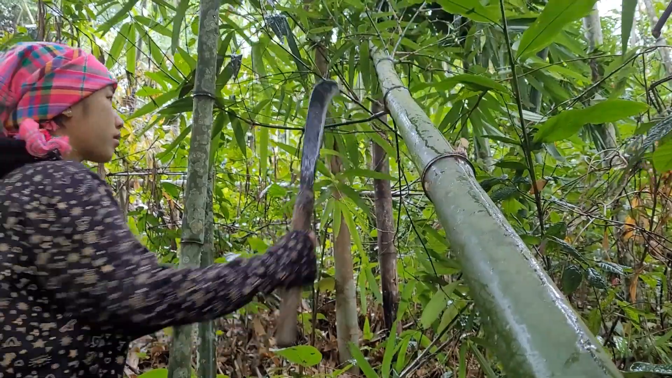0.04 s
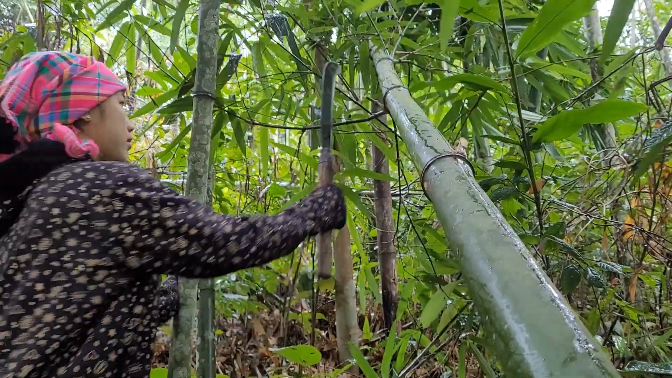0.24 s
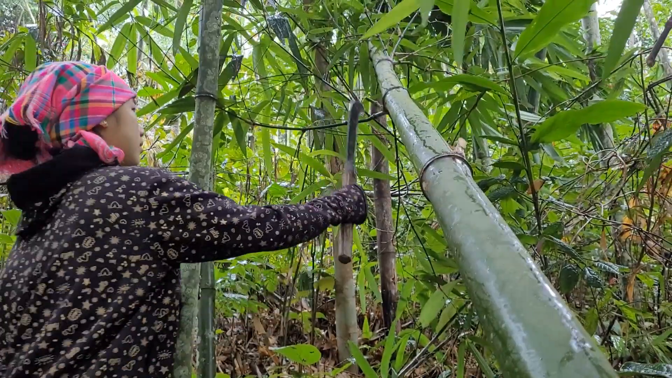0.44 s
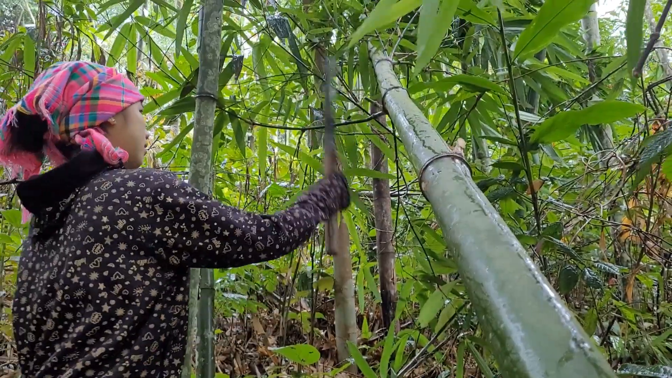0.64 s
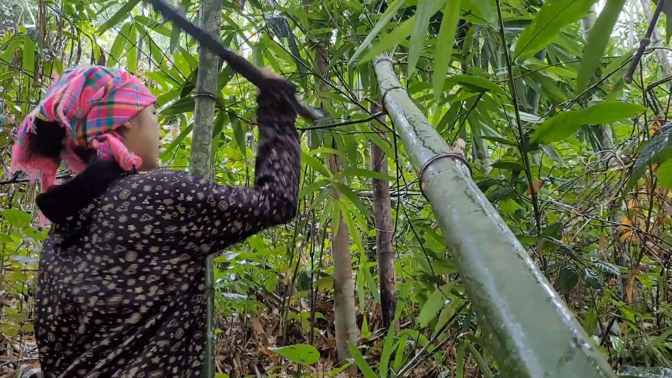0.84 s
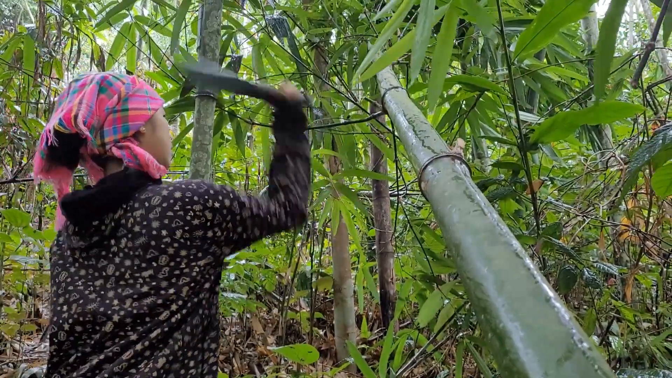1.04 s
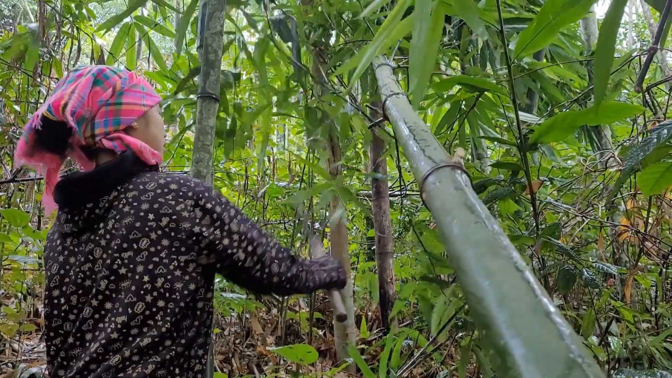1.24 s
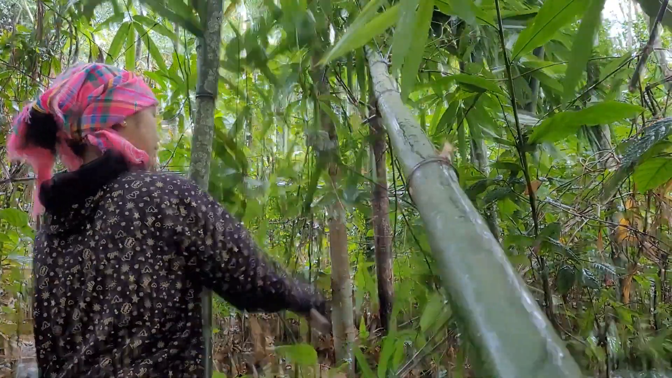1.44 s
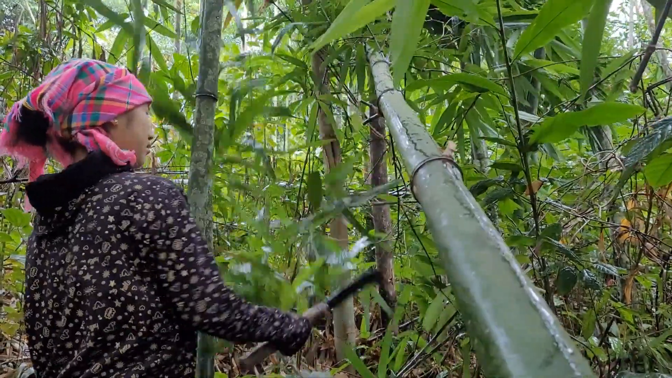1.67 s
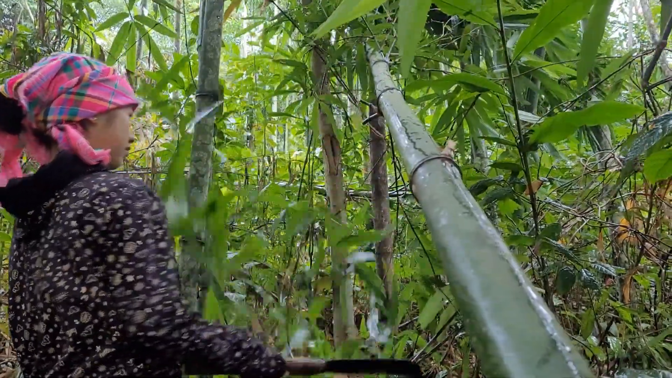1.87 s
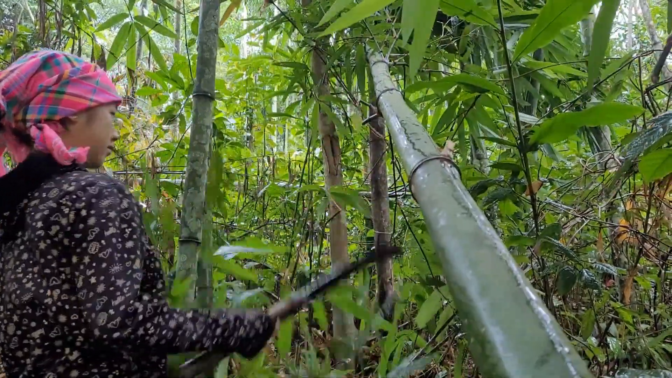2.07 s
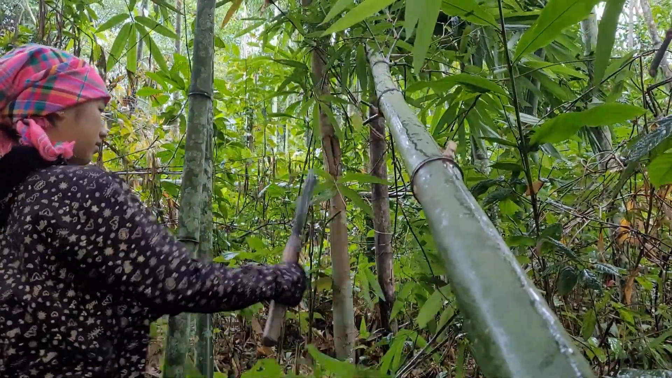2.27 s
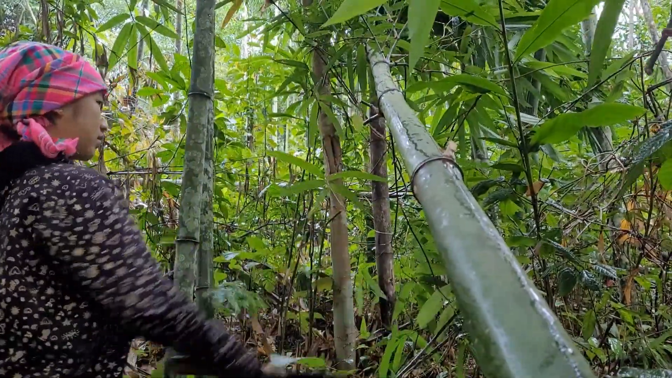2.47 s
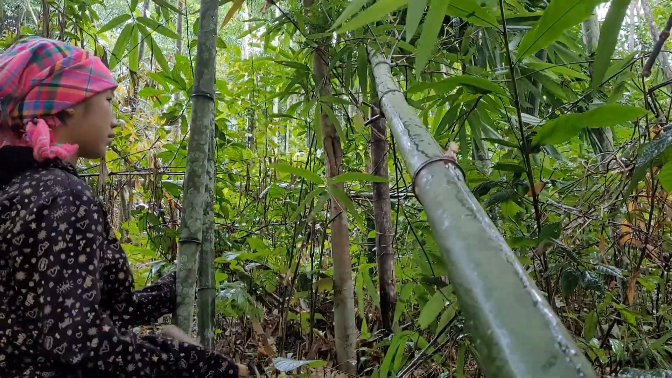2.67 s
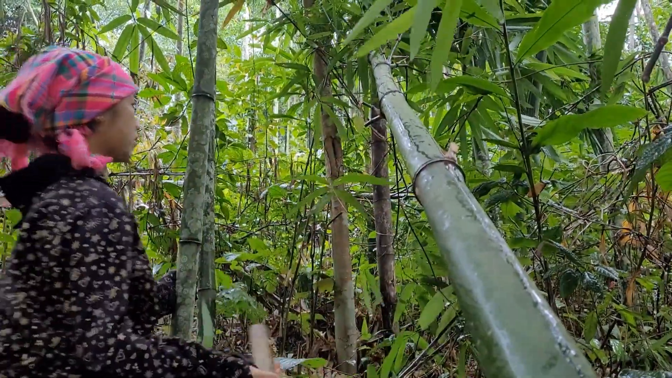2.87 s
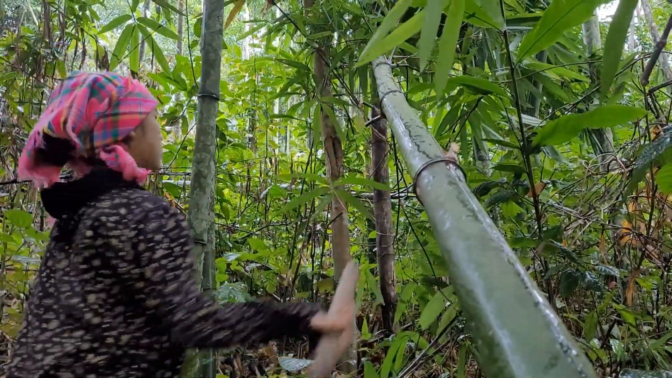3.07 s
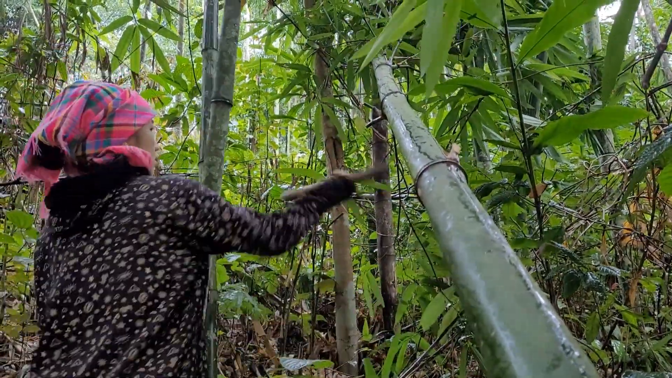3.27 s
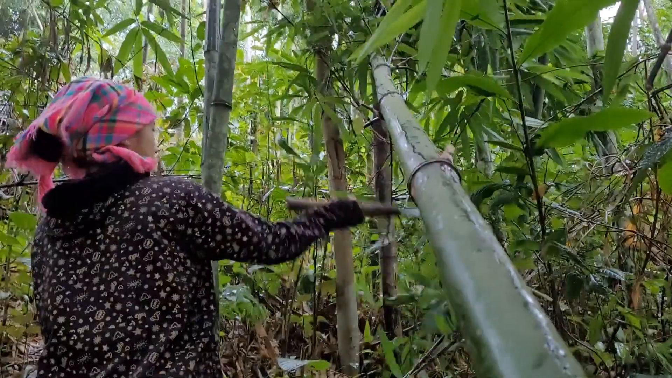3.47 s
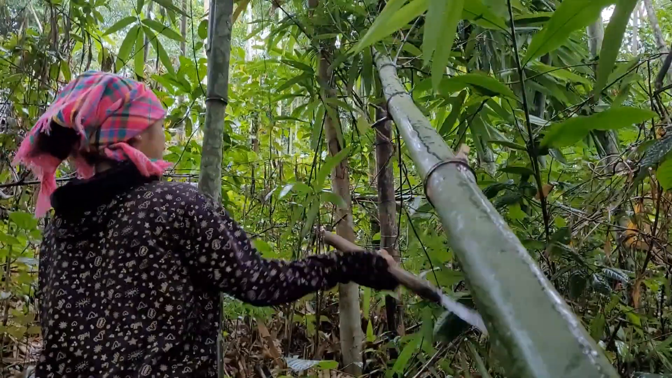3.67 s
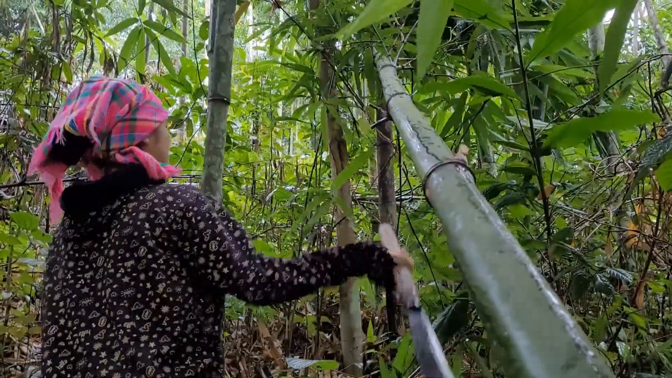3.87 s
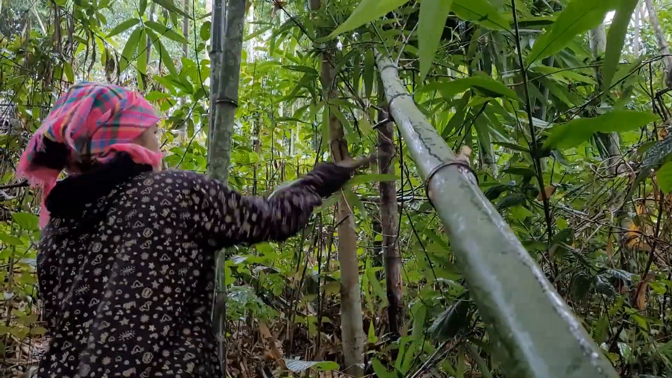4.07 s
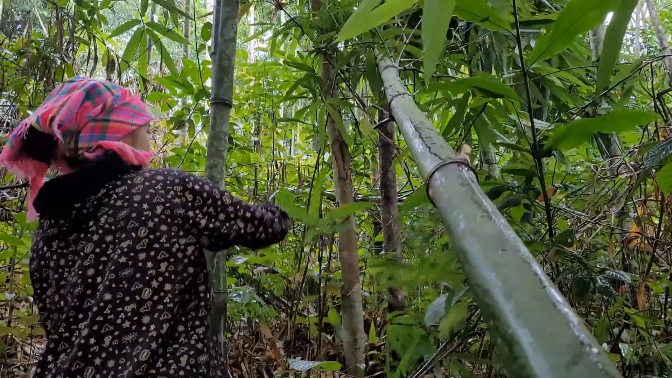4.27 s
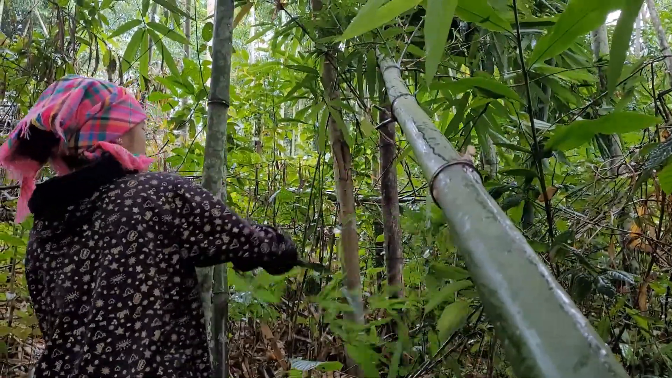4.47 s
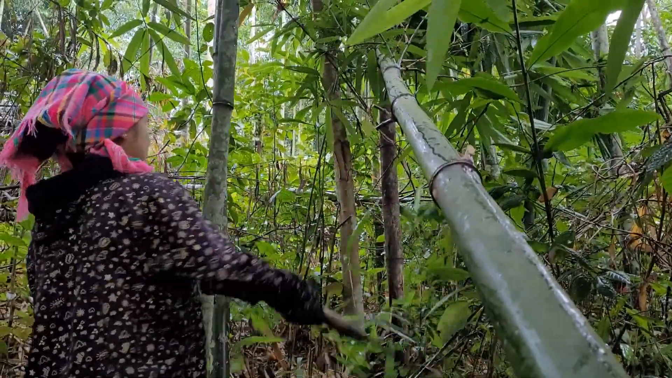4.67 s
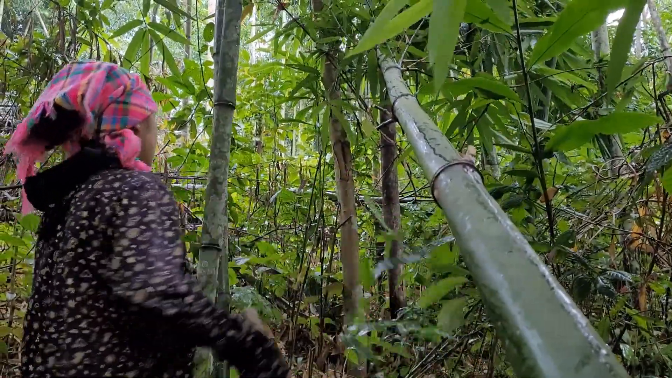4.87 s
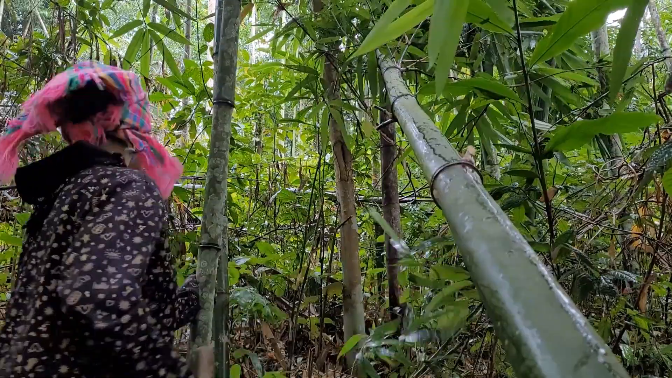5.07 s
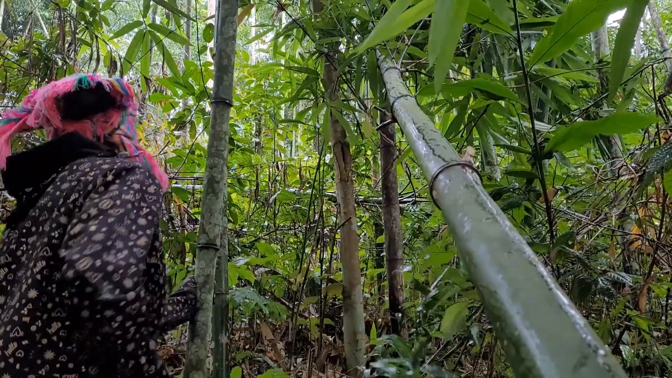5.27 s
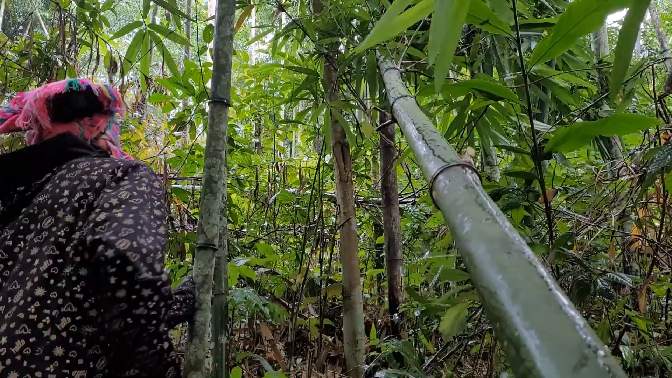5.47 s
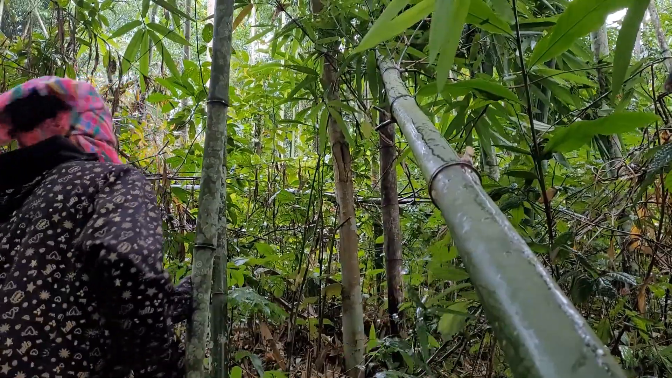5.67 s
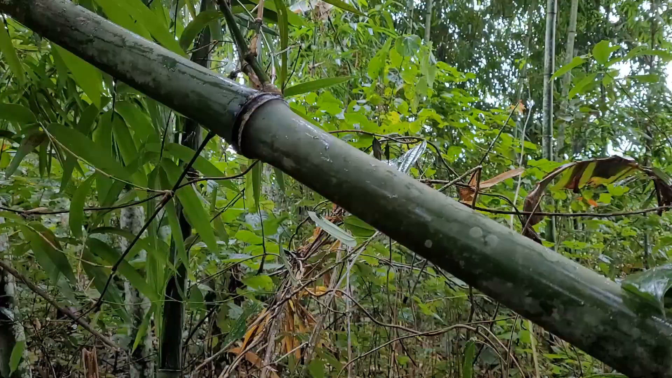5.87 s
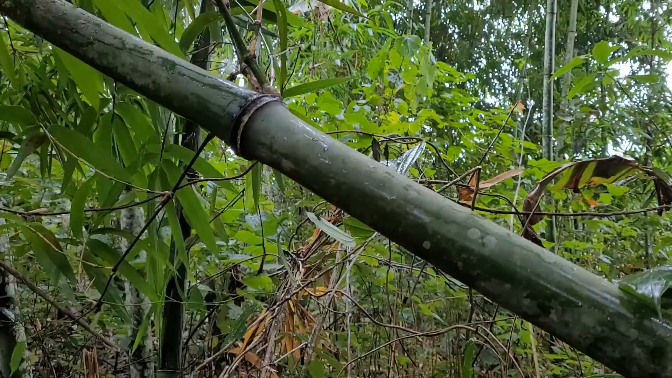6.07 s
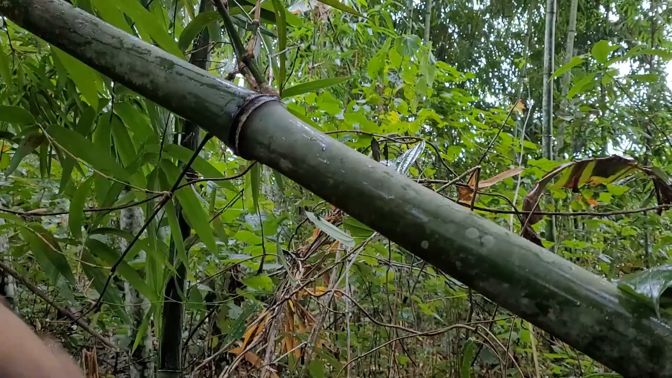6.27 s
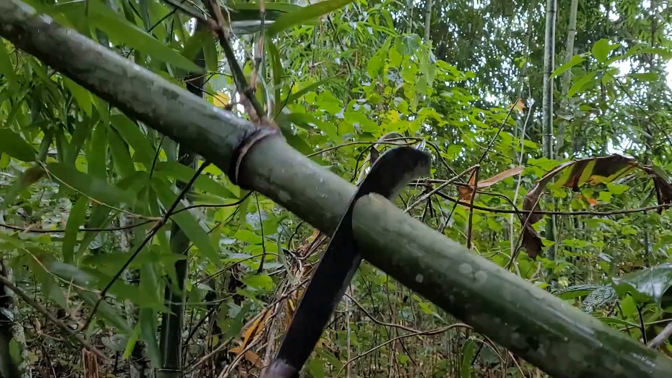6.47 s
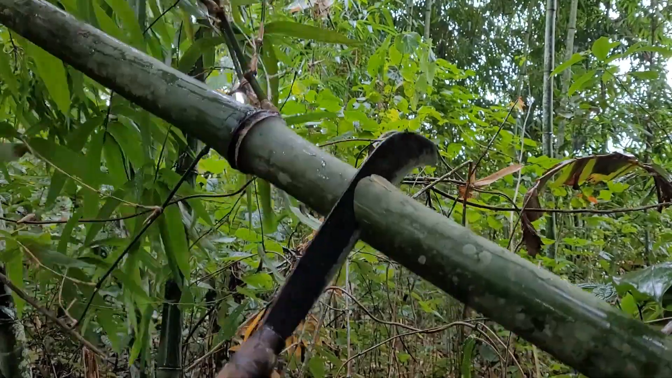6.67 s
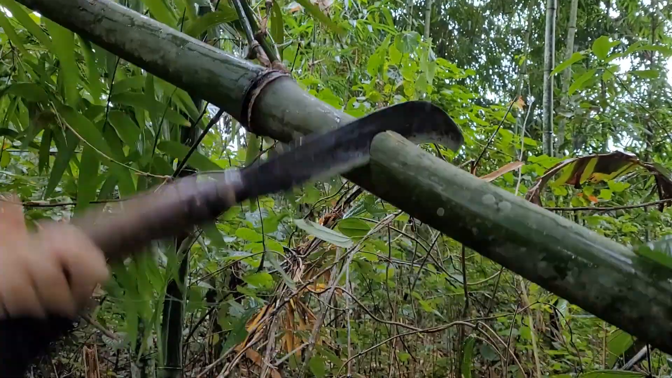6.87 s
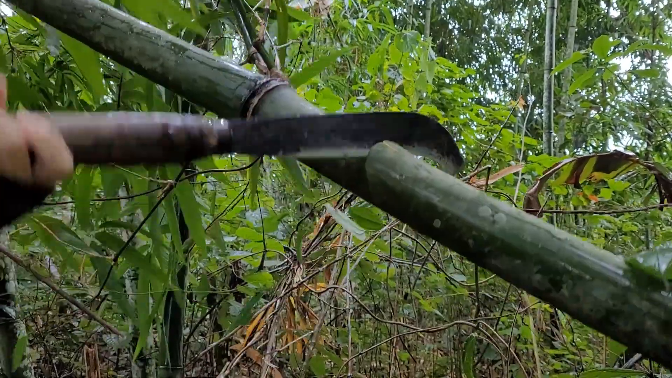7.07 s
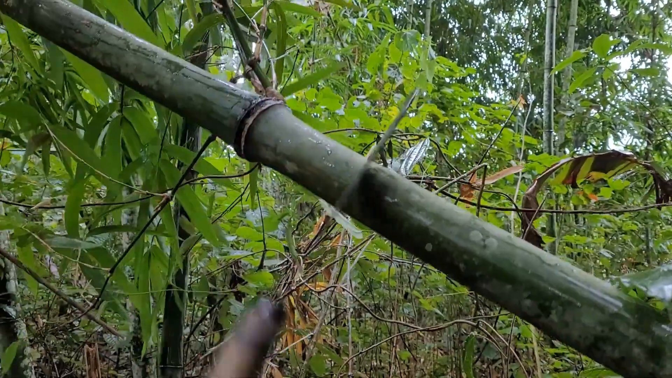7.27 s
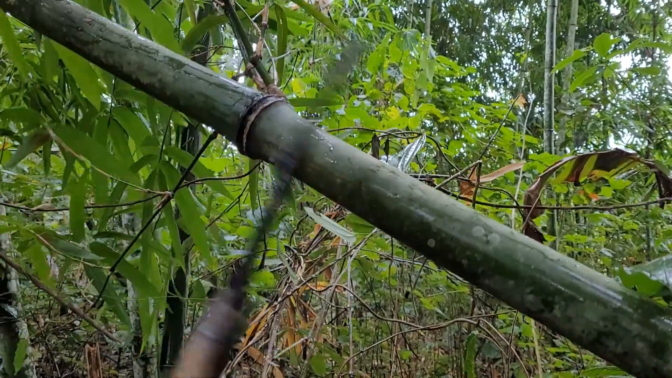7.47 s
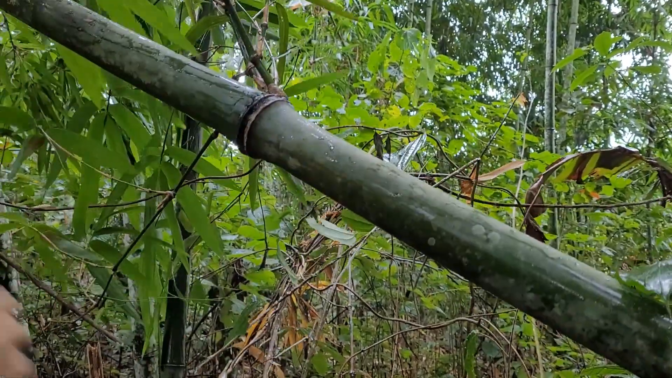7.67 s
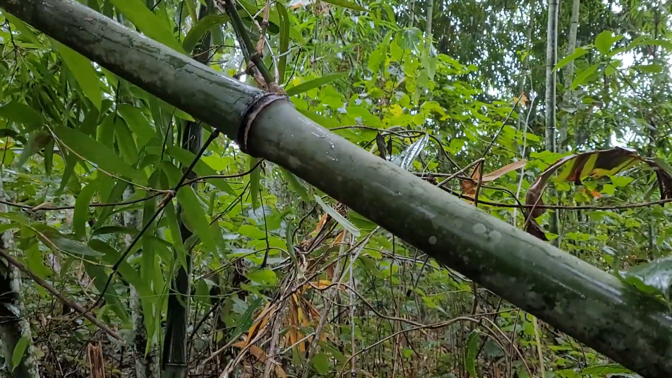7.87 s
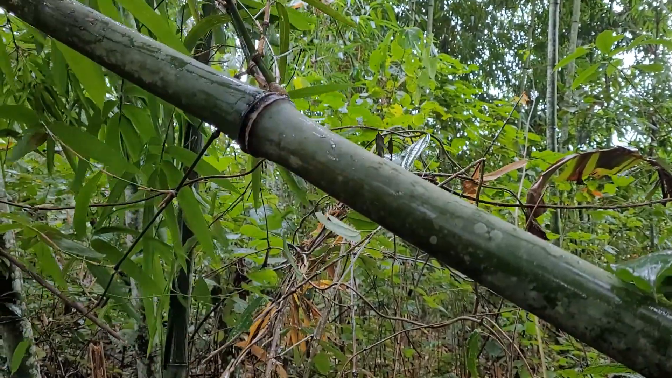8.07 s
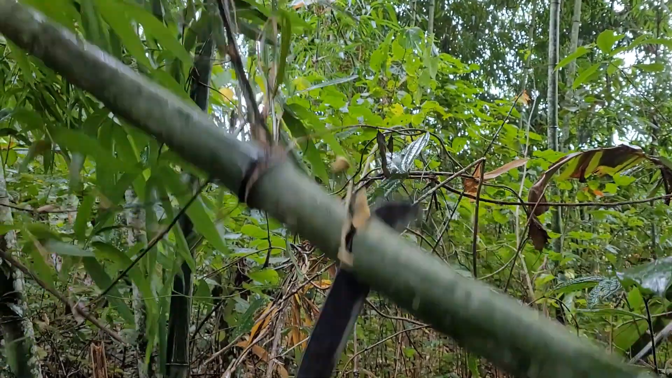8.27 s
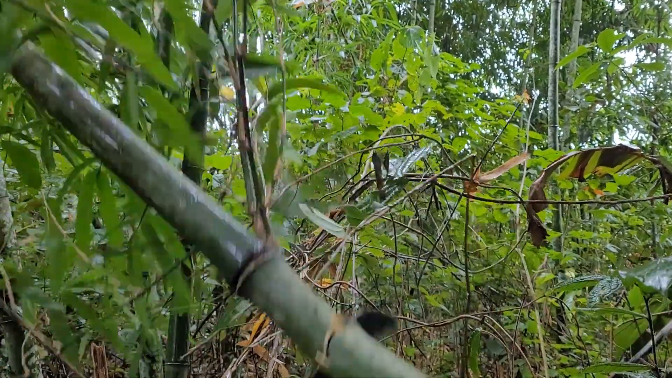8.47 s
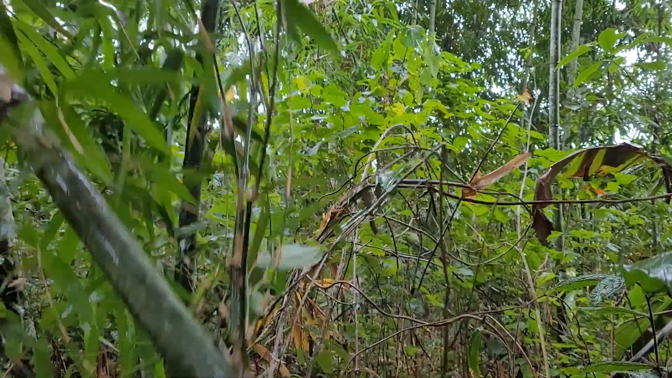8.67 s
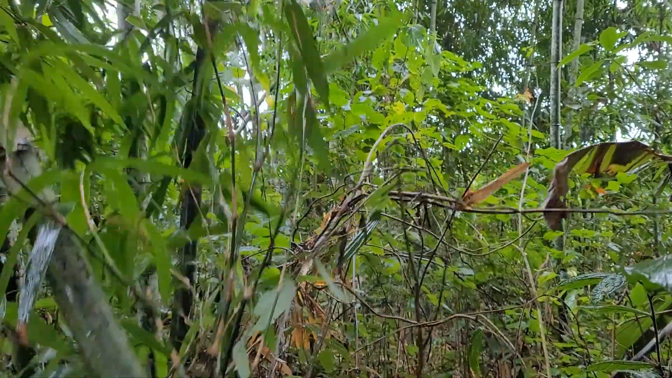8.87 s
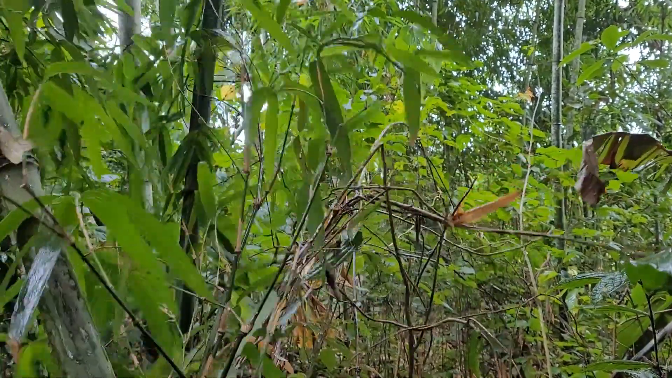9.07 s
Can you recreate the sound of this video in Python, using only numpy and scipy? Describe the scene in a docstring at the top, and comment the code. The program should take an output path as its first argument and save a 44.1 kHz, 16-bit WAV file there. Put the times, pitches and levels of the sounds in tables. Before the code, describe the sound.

Leaves rustle and twigs crackle outdoors while a blade strikes green bamboo at uneven intervals, each blow a crunchy crack with a short hollow ring. Branches thud and the steel briefly scrapes as it jerks loose. A final chop sets the stem groaning; it cracks apart and crashes through foliage with hollow knocks and rattling. The sound is close and in stereo, over a faint hush.

```python
"""A billhook lops branches, then fells a green bamboo culm, close to two microphones in a grove.
Leaves rustle and twigs snap throughout. From 0.5 s, chops crush fibres, ring the hollow culm and
shake the foliage; between them cut branches thump and the blade scrapes and jerks free.
After the last chop at 8.27 s the culm creaks in stick-slip, splits with a crack at 8.57 s and
falls through the leaves, knocking on stems while its split strips rattle."""
import sys
import numpy as np
from scipy import signal
from scipy.fft import rfft, irfft, next_fast_len
from scipy.io import wavfile
from scipy.ndimage import uniform_filter1d

SR = 44100
rng = np.random.default_rng(int(sys.argv[2]) if len(sys.argv) > 2 else 0)


def inscribe(sig):
    """Save sig as 16-bit PCM at rate SR to the path in sys.argv[1].

    A 1-D sig is mono; a 2-D sig holds one channel per row.
    Samples are clipped to [-1, 1] before scaling.
    """
    pcm = np.round(np.clip(np.atleast_2d(sig).T, -1, 1) * 32767)
    wavfile.write(sys.argv[1], SR, pcm.astype(np.int16))


N = 403074
N_FFT = next_fast_len(N)
TIME_S = np.arange(N) / SR
LEAD_S = .03  # run-up to an impact or scrape

# Foliage motion: time_s, level_db
RUSTLE = [(0, -70), (0.45, -61), (0.76, -65), (1.17, -65), (1.3, -44), (1.7, -45.5), (2.15, -48),
          (2.4, -47), (2.75, -48), (2.9, -56), (4.1, -55), (4.5, -53.5), (5.4, -59), (5.85, -57.5),
          (5.95, -61.5), (6.2, -79.5), (6.37, -65), (6.5, -38), (6.7, -50), (7.2, -58.5), (7.45, -74),
          (8.24, -60), (8.33, -32.5), (8.45, -42), (8.9, -41), (9.14, -40)]
# Leaf spectrum: freq_hz, density_db
LEAF_SPECTRUM = [(15, -54.5), (25, -32.5), (59, -11.5), (179, -18), (261, -8), (512, -10), (854, -5.5),
                 (1280, -2.5), (1500, -9.5), (1970, -2.5), (2250, -3.5), (7380, -4), (9160, -8.5),
                 (15700, -4)]
# Spectrum of stems and feet: freq_hz, density_db
STIR_SPECTRUM = [(25, -41.5), (60, -41.5), (300, -12.5), (700, -25), (2000, -37.5)]
# Hand, foot or branch brushing foliage: start_s, hold_s, leaves_db, stems_db
BRUSHES = [(0.13, 0.023, -55, -61), (1.913, 0.023, -66, -63), (2.27, 0.037, -50, -61),
           (2.544, 0.056, -50, -59), (3.502, 0.038, -56, -61.5), (4.794, 0.12, -53, -79),
           (5.02, 0.038, -77, -74.5), (5.601, 0.048, -57, -61.5), (5.773, 0.021, -45.5, -51),
           (6.266, 0.021, -59.5, -69), (6.545, 0.018, -61, -55), (6.683, 0.013, -56, -54),
           (6.843, 0.084, -55.5, -88), (7.587, 0.026, -56.5, -77), (8.656, 0.079, -36.5, -56)]
# Breaking twigs and fibres, and one short knock at 7.288 s: start_s, level_db, centre_hz
SNAPS = [(0.295, -51, 11000), (0.313, -58, 9100), (0.368, -54, 10000), (0.43, -57, 3020),
         (0.467, -51, 1940), (0.608, -47, 1510), (0.992, -60, 9000), (0.689, -56, 7000), (0.881, -49, 3530),
         (0.964, -49.5, 2100), (1.397, -41, 3010), (1.43, -31, 950), (1.706, -41.5, 1200),
         (1.803, -42.5, 2020), (2.274, -44, 605), (3.713, -50, 1290), (3.747, -54, 1294),
         (4.089, -55, 1200), (4.761, -44, 6050), (5.194, -47.5, 1816), (5.498, -51.5, 4350),
         (5.592, -52.5, 1153), (5.617, -53.5, 3395), (5.877, -48.5, 497), (5.995, -58, 3550),
         (6.031, -42.5, 1200), (6.201, -51, 2560), (6.301, -50, 2030), (6.493, -34, 1130),
         (6.632, -46, 696), (7.029, -52, 800), (7.112, -57.5, 3070), (7.288, -37, 790),
         (7.585, -49.5, 2780), (7.737, -59, 2980), (7.762, -53, 4950), (7.922, -56, 1010),
         (8.011, -51.5, 2990), (8.136, -50, 2470), (8.488, -49, 4040), (8.733, -29, 9300),
         (8.818, -34, 11600), (8.889, -38, 9050), (8.94, -33, 7900), (9.033, -33, 9100),
         (9.066, -37, 10020), (9.126, -38, 8950)]
# Spectrum of crushed fibres: freq_hz, density_db
CRUSH_SPECTRUM = [(180, -25), (300, -5.5), (545, -5.5), (698, -1.5), (1420, -5.5), (2220, -1.5), (3050, -4),
                  (3310, -3), (4110, -4), (6210, -6.5), (15700, -12.5)]
# Impacts on bamboo (chops, cut branches thumping, the blade jerking free, the culm splitting):
# start_s, crush_db, crack_db, crack_hz, low_band_re_crack_db, ring_db, ring_hz,
# thud_db, thud_hz, puff_db, crush_hold_s, crush_t60_s, crush_tilt_db_per_oct
IMPACTS = [(0.521, -41.5, -18, 2280, -33, -31.5, 377, -44.5, 232, -44, 0.0045, 0.17, -10),
           (1.189, -16.5, -3.5, 2550, -3, -9, 335, -16.5, 229, -26, 0.0087, 0.29, 3),
           (1.485, -64, -47, 2600, 9, -22, 310, -16.5, 125, -30, 0.0065, 0.25, 10),
           (3.3432, -18.5, -1.5, 2750, 4, -20, 750, -13.5, 156, -19.5, 0.0052, 0.23, -3),
           (3.389, -23, -21.5, 2800, 7, -14.5, 225, -7.5, 116.5, -26.5, 0.006, 0.3, 3.5),
           (4.136, -16.5, -2, 2300, -20, -15, 748, -19.5, 110.6, -26.5, 0.014, 0.18, 0.8),
           (6.3865, -18, -6.5, 2400, 2, -13, 400, -16, 278, -26.5, 0.015, 0.21, -0.3),
           (7.305, -34, -21.5, 1460, -3.5, -39, 720, -52, 315.4, -72, 0.0031, 0.11, -0.5),
           (8.268, -16, -4, 2240, -5, -7.5, 487, -31.5, 173, -37, 0.012, 0.2, -0.2),
           (8.573, -14.5, -2, 2230, -2, -28, 700, -41, 310, -76, 0.003, 0.28, 0)]
# Hollow culm modes: freq_ratio, gain_db, t60_s
CULM_MODES = [(1.001, 7, 0.052), (1.33, -1.5, .04), (1.5, -2.5, 0.027), (1.9, -4.5, 0.055),
              (2.4, -10, 0.05), (4.6, -17.5, 0.05)]
# Edge dragging on wood: start_s, hold_s, level_db, rasp_hz, steel_db
SCRAPES = [(0.611, 0.017, -45, 1620, -20), (7.254, 0.015, -42.5, 8100, 4), (7.283, 0.016, -41.5, 10900, 0),
           (7.3, 0.0054, -38, 13000, -6), (7.367, 0.034, -47, 11100, -2)]
# Steel blade modes: freq_hz, gain_db, t60_s
BLADE_MODES = [(10160, -2, 0.21), (11000, -11, .06), (13400, -1, 0.066)]
# Branch or culm hitting stems: start_s, ring_db, ring_hz, splinter_db
KNOCKS = [(1.4893, -31, 1173, -57), (8.362, -28, 627, -32), (8.401, -33, 1004, -46), (8.497, -23, 630, -41),
          (8.338, -34, 910, -37), (8.382, -28, 630, -25.5), (8.396, -17, 491, -27.5),
          (8.465, -22.5, 570, -53), (8.488, -18, 587, -33.5), (8.531, -15, 697, -27.5),
          (8.637, -4.5, 653, -16.5), (8.699, -39, 800, -29), (8.723, -39, 1060, -30),
          (8.783, -21.5, 980, -48), (8.823, -23.5, 924, -46), (8.881, -29, 980, -38),
          (8.898, -19, 1004, -32), (8.96, -19, 495, -24.5), (9.004, -26, 1079, -37),
          (9.072, -18.5, 759, -29.5)]
# Half-cut culm giving way: start_s, hold_s, level_db
GROANS = [(8.29, 0.048, -38.5), (8.39, 0.043, -41), (8.49, 0.056, -34.5), (8.578, 0.028, -28),
          (8.65, 0.1, -38), (8.79, 0.069, -34.5), (8.885, 0.09, -38)]
# Stick-slip: time_s, rate_hz, roughness (0-1)
SLIPS = [(8.301, 165, 0.21), (8.4, 213, 0.25), (8.5, 235, 0.25), (8.561, 255, 0.27), (8.592, 333, 0.08),
         (8.661, 370, 0.3), (8.799, 321, .5), (9.062, 334, 0.45)]
# Modes of the split strips: freq_hz, width_hz, gain_db
STRIP_MODES = [(630, 390, -5), (1006, 136, 1.5), (1174, 70, -2.5), (2050, 1400, -9.5)]
# Strips rattling between knocks: start_s, hold_s, level_db
RATTLES = [(8.7, 0.054, -37), (8.785, 0.068, -31.5), (8.883, 0.081, -30.5), (9.008, 0.012, -34.5)]
# Likeness of the microphones: freq_hz, coherence
MIC_COHERENCE = [(60, .6), (150, .9), (500, .93), (950, .4), (2000, .05), (15000, 0)]
# Microphone imbalance: freq_hz, left_minus_right_db
MIC_BALANCE = [(60, -0.5), (180, -1), (550, -0.5), (1650, -4), (4970, -2), (15000, 0)]


def gain(db):
    return 10 ** (np.asarray(db) / 20)


def unit_rms(x):
    return x / np.sqrt(np.mean(x ** 2) + 1e-20)


def unit_peak(x):
    return x / abs(x).max()


def curve_at(points, hz):
    points_hz, values = np.transpose(points)
    return np.interp(np.log(hz + 1), np.log(points_hz + 1), values)


def add(mix, start_s, sound, left_db):
    part = mix[:, round(start_s * SR):][:, :sound.shape[-1]]
    part += (sound * gain([[left_db / 2], [-left_db / 2]]))[:, :part.shape[1]]


def colour(x, spectrum, tilt_db_per_oct=0.):
    hz = np.fft.rfftfreq(x.shape[-1], 1 / SR)
    shape_db = curve_at(spectrum, hz) + tilt_db_per_oct * np.log2(hz / 3000 + 0.21)
    return unit_rms(irfft(rfft(x) * gain(shape_db), x.shape[-1]))


def resonate(x, hz, width_hz):
    radius = np.exp(-np.pi * width_hz / SR)
    return 2 * signal.lfilter([1 - radius], [1, -radius * np.exp(2j * np.pi * hz / SR)], x).real


def mode(x, hz, t60_s):
    return resonate(x, hz, np.log(1000) / np.pi / t60_s)


def grains(size, grain_s, spread_db):
    """Stereo noise, alike in the bass; its level jumps as fibres or leaves give way in turn."""
    jumps = unit_rms(uniform_filter1d(rng.standard_normal(size), max(round(grain_s * SR), 1)))
    left, other = rng.standard_normal((2, size))
    coherence = curve_at(MIC_COHERENCE, np.fft.rfftfreq(size, 1 / SR))
    right = irfft(coherence * rfft(left) + np.sqrt(1 - coherence ** 2) * rfft(other), size)
    return np.array([left, right]) * gain(spread_db * jumps)


def envelope(events, rise_db_per_s, fall_db_per_s):
    """Gain of events that rise, hold and fall; powers add."""
    t = TIME_S[::16]
    db = [level_db - rise_db_per_s * np.maximum(start_s - t, 0)
          - fall_db_per_s * np.maximum(t - start_s - hold_s, 0) for start_s, hold_s, level_db in events]
    return np.interp(TIME_S, t, np.sqrt((gain(np.maximum(db, -200)) ** 2).sum(0)))


def foliage():
    """Leaves hiss in drifting patches and crackle; stems stir below, over a dull steady hush."""
    rustle = gain(np.interp(TIME_S, *np.transpose(RUSTLE)))
    brushes, slopes_db_per_s = np.array(BRUSHES), (370, 217)
    leaf_gain = np.hypot(rustle, envelope(brushes[:, :3], *slopes_db_per_s))
    stem_gain = np.hypot(gain(-22.5) * rustle, envelope(brushes[:, [0, 1, 3]], *slopes_db_per_s))
    _, _, bins = signal.stft(colour(grains(N_FFT, 0.0007, 1.5), LEAF_SPECTRUM), SR, nperseg=512)
    patches = uniform_filter1d(rng.standard_normal(bins.shape[1:]), 12, axis=0)
    patches = unit_rms(uniform_filter1d(patches, 6, axis=1))
    hiss = unit_rms(signal.istft(bins * gain(1.7 * patches), SR, nperseg=512)[1][:, :N])
    ticks = gain(4.8 * np.minimum(rng.exponential(1, N), 3.5)) * (rng.random(N) < 110 / SR)
    ticks = signal.oaconvolve(ticks, np.exp(-np.arange(600) / (0.017 * SR)))[:N]
    crackle = unit_rms(ticks * colour(grains(N_FFT, .001, 2), LEAF_SPECTRUM, -1.9)[:, :N])
    stir = colour(grains(N_FFT, 0.033, 4.5), STIR_SPECTRUM)[:, :N]
    hush = colour(grains(N_FFT, .01, 1.9), LEAF_SPECTRUM, tilt_db_per_oct=-4)[:, :N]
    return leaf_gain * (hiss + gain(-6) * crackle) + stem_gain * stir + gain(-68.5) * hush


def snap(level_db, centre_hz, t60_s=0.05):
    """A twig breaks: a broad burst, strongest where it rings."""
    t = np.arange(round(.12 * SR)) / SR
    noise = grains(len(t), grain_s=0.002, spread_db=5.5)
    ring = unit_rms(resonate(noise, centre_hz, .5 * centre_hz))
    burst = ring + gain(-6.5) * colour(noise, CRUSH_SPECTRUM)
    attack = np.minimum(t / 0.0015, 1) * (1 + 0.67 * np.exp(-t / 0.00073))
    return gain(level_db - 60 * t / t60_s) * attack * burst


def swish(end_db, rise_db_per_s=1500):
    """Leaves brushed ever louder just before an impact."""
    t = np.arange(-round(LEAD_S * SR), 0) / SR
    return colour(grains(len(t), .002, 2), LEAF_SPECTRUM) * gain(end_db + rise_db_per_s * t)


def culm_ring(shocks, lowest_hz):
    """Modes of the hollow culm; a shorter length rings higher."""
    return unit_peak(sum(gain(db) * np.sqrt(t60_s) * mode(shocks, ratio * lowest_hz, t60_s)
                         for ratio, db, t60_s in CULM_MODES))


def impact(crush_db, crack_db, crack_hz, low_band_re_crack_db, ring_db, ring_hz,
           thud_db, thud_hz, puff_db, hold_s, t60_s, tilt_db_per_oct):
    """Fibres crush and crack, the culm rings, the stem shudders, air puffs on each microphone."""
    t = np.arange(round(.5 * SR)) / SR
    force = np.minimum(t / 0.0004, 1) * gain(-60 * np.maximum(t - hold_s, 0) / t60_s)
    crush = colour(grains(len(t), 0.00091, 1.5), CRUSH_SPECTRUM, tilt_db_per_oct) * force
    crack_t60_s = 0.046 + 7 * hold_s
    attack = np.minimum(t / 0.0012, 1) * (1 + 1.8 * np.exp(-t / 0.0035))
    burst = grains(len(t), 0.0012, 2.5) * attack * gain(-60 * t / crack_t60_s)
    low_band = gain(low_band_re_crack_db) * resonate(burst, 0.41 * crack_hz, 420)
    crack = unit_peak(resonate(burst, crack_hz, 600) + low_band)
    ring = culm_ring(grains(len(t), 0.0035, 7.5) * np.minimum(t / 0.0043, 1) * force ** 1.93, ring_hz)
    swell = np.minimum(t / 0.029, 1) * gain(-60 * t / 0.16)
    jolt = rng.standard_normal((2, len(t))) * (swell + 4 * np.exp(-t / 0.0012))
    shudder = resonate(resonate(jolt, thud_hz, 53), thud_hz, 570)
    thud = unit_peak(shudder * gain([[-3.5], [3.5]]))  # stronger on the right
    air = rng.standard_normal((2, len(t))) * swell
    puff = unit_peak(resonate(resonate(air, 61, 45), 61, 45))
    return (gain(crush_db) * crush + gain(crack_db) * crack + gain(ring_db) * ring
            + gain(thud_db) * thud + gain(puff_db) * puff)


def scrape(hold_s, level_db, rasp_hz, steel_db, rise_db_per_s=3000, fall_db_per_s=1200):
    """Steel rasps on wood in one broad band and sings in its high modes."""
    t = np.arange(-round(LEAD_S * SR), round(.3 * SR)) / SR
    drag = gain(level_db + rise_db_per_s * np.minimum(t, 0) - fall_db_per_s * np.maximum(t - hold_s, 0))
    hiss = colour(grains(len(t), 0.0008, 2), CRUSH_SPECTRUM, tilt_db_per_oct=1.5)
    rasp = drag * (gain(-2) * unit_rms(resonate(hiss, rasp_hz, 1500)) + gain(-5.5) * hiss)
    return rasp + sum(gain(db + steel_db + 8) * mode(rasp, hz, t60_s) for hz, db, t60_s in BLADE_MODES)


def knock(ring_db, ring_hz, splinter_db, contact_fall_db_per_s=529.4, splinter_t60_s=0.098):
    """A shock rings the tube and throws splinters."""
    t = np.arange(round(.25 * SR)) / SR
    shocks = grains(len(t), grain_s=0.0019, spread_db=0.5)
    splinters = colour(shocks, CRUSH_SPECTRUM, 0.5) * gain(splinter_db - 60 * t / splinter_t60_s)
    contact = gain(-contact_fall_db_per_s * t) + 3 * np.exp(-t / 0.00041)
    return gain(ring_db) * culm_ring(shocks * contact, ring_hz) + splinters


def creak(slopes_db_per_s=(1260, 700)):
    """The bent wall groans in uneven stick-slip; every third slip rattles the split strips."""
    time_s, rate_hz, roughness = np.transpose(SLIPS)
    rate_hz, roughness = np.interp(TIME_S, time_s, rate_hz), np.interp(TIME_S, time_s, roughness)
    wander, waver = (unit_rms(uniform_filter1d(rng.standard_normal(N), 350)) for _ in range(2))
    cycles = np.cumsum(rate_hz * (1 + 0.2665 * roughness * wander)) / SR
    harmonics = sum(gain(-5 * k) * np.cos(2 * np.pi * k * cycles) for k in range(1, 7))
    groan = unit_rms(harmonics * gain(1.3 * roughness * waver))
    overtones = sum(gain(db - 6) * resonate(groan, 0.98 * hz, width_hz)
                    for hz, width_hz, db in STRIP_MODES[:2])
    kicks = np.diff(np.floor(cycles / 3), prepend=0) * gain(rng.uniform(-3, 2, N))
    bursts = signal.lfilter([1], [1, -.993], kicks) * grains(N_FFT, .001, 1)[:, :N]
    rattle = 0
    for k, (hz, width_hz, db) in enumerate(STRIP_MODES):
        ring = resonate(resonate(bursts, hz, width_hz), hz, 3 * width_hz)
        rattle += (-1) ** k * gain(db) / np.sqrt(width_hz) * ring
    return (unit_rms(groan + overtones) * envelope(GROANS, *slopes_db_per_s)
            + unit_rms(rattle) * envelope(RATTLES, *slopes_db_per_s))


def grove_scatter(x, t60_s=0.26):
    """Stems and leaves return a short diffuse tail."""
    t = np.arange(round(.7 * SR)) / SR
    tail = rng.standard_normal((2, len(t))) * gain(-60 * t / t60_s) * np.minimum(t / 0.053, 1)
    tail = signal.lfilter([1, -1], [1, -.93], tail)  # bass cut
    return signal.fftconvolve(x, tail / np.linalg.norm(tail[0]), axes=1)[:, :N]


def scene():
    work = creak()
    for start_s, *settings in SCRAPES:
        add(work, start_s - LEAD_S, scrape(*settings), left_db=0)
    for start_s, crush_db, *settings in IMPACTS:
        add(work, start_s, impact(crush_db, *settings), left_db=-0.6)
        add(work, start_s - LEAD_S, swish(crush_db - 20.5), left_db=2.5)
    for start_s, *settings in KNOCKS:
        add(work, start_s, knock(*settings), left_db=1.5)
    for start_s, *settings in SNAPS:
        add(work, start_s, snap(*settings), left_db=-1.5)
    return work + gain(-18.5) * grove_scatter(work) + foliage()


def record(dry):
    """Unequal microphones, a brief level dip, a band limit."""
    dip_start_s, dip_end_s, dip_edge_s, dip_db = 5.885, 5.93, .012, -40
    cutoff_hz = 15750
    balance = gain(np.outer([.5, -.5], curve_at(MIC_BALANCE, np.fft.rfftfreq(N_FFT, 1 / SR))))
    inside = np.minimum(TIME_S - dip_start_s, 2 * (dip_end_s - TIME_S)) / dip_edge_s
    dip = gain(dip_db * np.clip(inside, 0, 1) ** .5)
    heard = irfft(rfft(dry, N_FFT) * balance, N_FFT)[:, :N] * dip
    lowpass = signal.firwin(511, cutoff_hz, window=("kaiser", 12), fs=SR)
    return signal.oaconvolve(heard, lowpass[None], "same")


dry = scene()
out = record(dry)
inscribe(out)
```